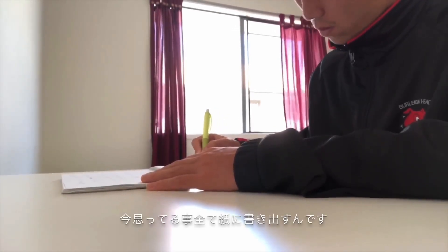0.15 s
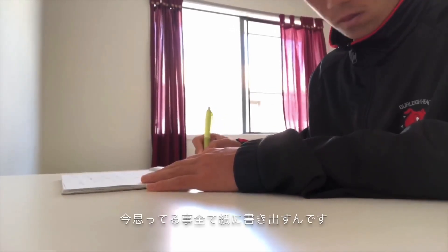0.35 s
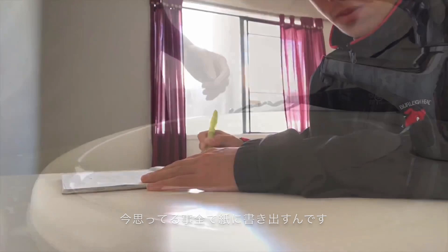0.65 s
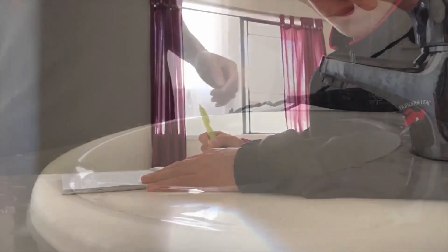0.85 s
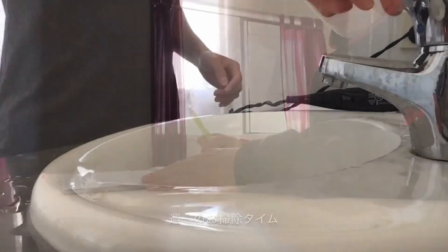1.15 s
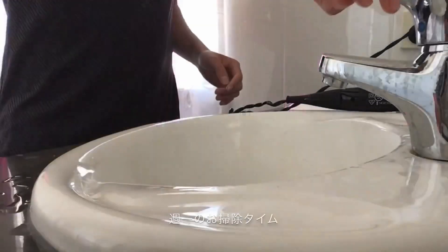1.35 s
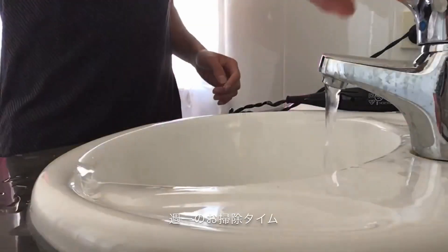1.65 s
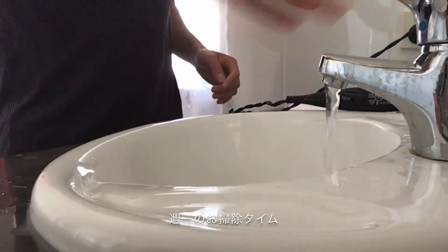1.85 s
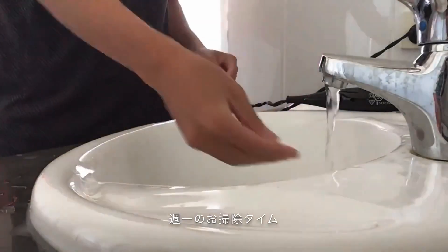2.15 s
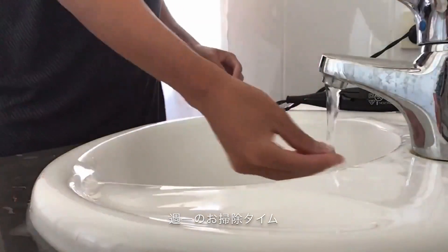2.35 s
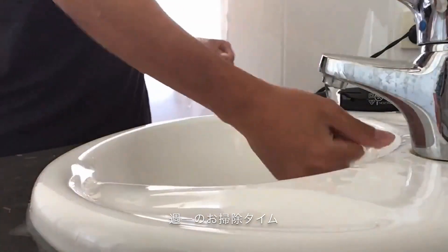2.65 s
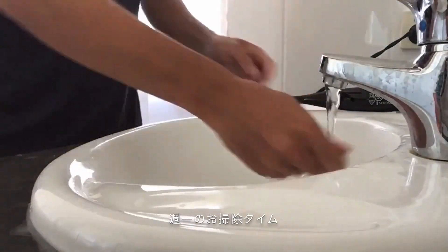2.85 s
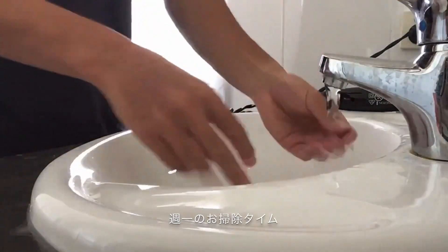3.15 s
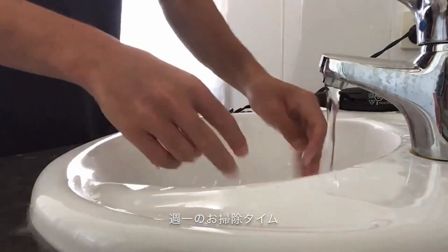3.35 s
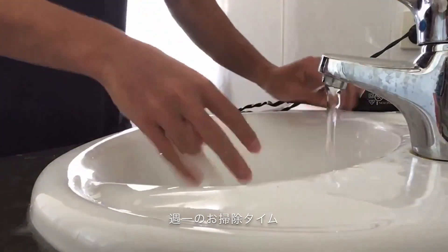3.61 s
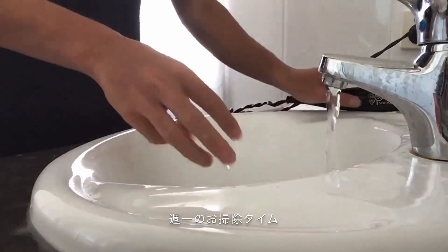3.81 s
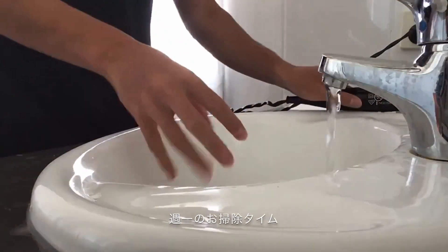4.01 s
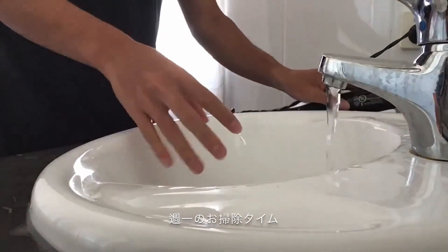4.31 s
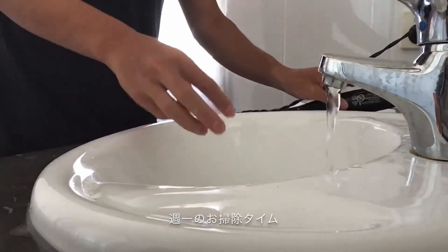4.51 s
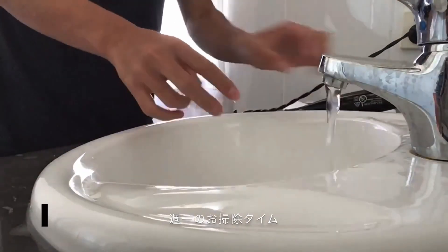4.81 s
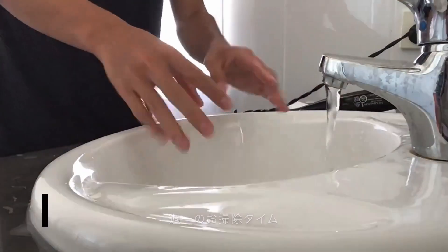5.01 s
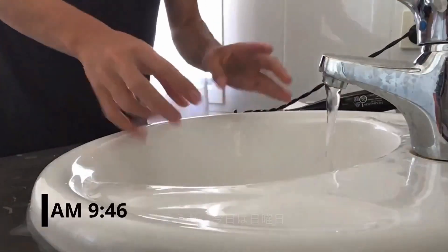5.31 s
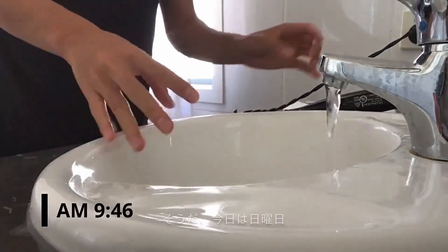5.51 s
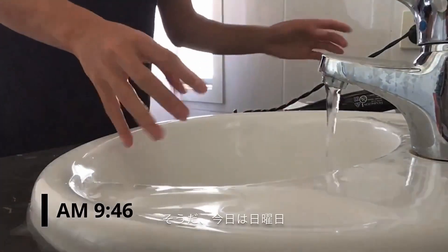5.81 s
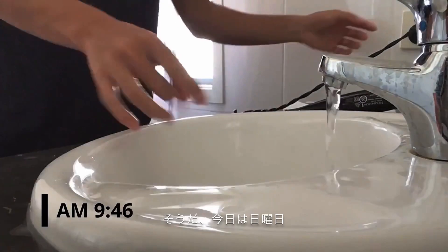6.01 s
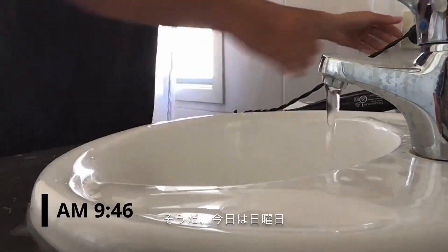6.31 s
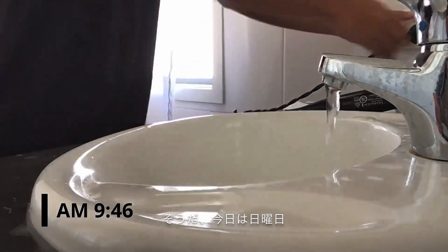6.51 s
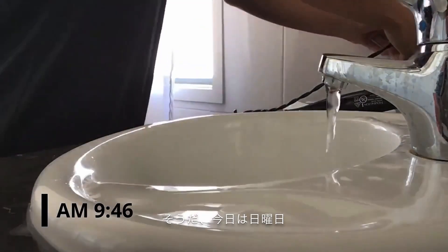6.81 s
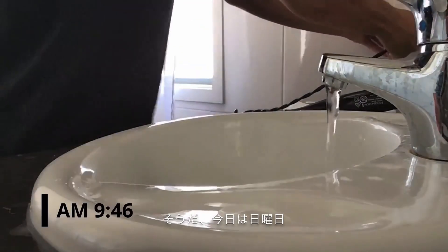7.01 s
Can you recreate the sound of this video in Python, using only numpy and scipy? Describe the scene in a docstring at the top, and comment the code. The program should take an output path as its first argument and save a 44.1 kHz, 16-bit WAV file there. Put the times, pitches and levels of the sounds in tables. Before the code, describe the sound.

Close to a bathroom basin: after muted desk thumps and near silence, running water starts abruptly, hissing through a metal spout and pattering low on ceramic. Quick wet splashes come in clusters as hands pass through the jet. Two knocks hit the counter, the first muffled, the second sharp, boomy and rattling, echoing off tiles. The steady stream continues over faint rumble, with three soft hollow bumps in the bowl.

```python
"""At a desk, then by a bathroom basin: a hand thumps softly, skin rustles, then a tap is opened.
Room air and a swelling low rumble are shaped noise; rustle and squeak are faint swells of noise and tone.
The valve hisses through a metal spout, the jet drums on ceramic modes, hands cut it into splashes.
Struck modes make thumps, knocks on the counter and bumps in the basin. Tiles echo splashes and knocks.
One microphone, close to the basin, feeds two equal channels."""
import sys
import numpy as np
from scipy import signal
from scipy.fft import rfft, irfft
from scipy.io import wavfile

SR = 44100
rng = np.random.default_rng(int(sys.argv[2]) if len(sys.argv) > 2 else 0)


def dump_mix(stems):
    """Bounce the given channels to the path in sys.argv[1] as a 16-bit WAV at rate SR."""
    frames = np.atleast_2d(stems).T  # one column per channel
    limited = np.clip(frames, -1, 1)  # hard clip at full scale
    pcm = np.round(limited * 32767).astype(np.int16)
    wavfile.write(sys.argv[1], SR, pcm)


N = 315756

# quiet room spectrum: (frequency [Hz], relative level [dB per Hz])
AIR_SPECTRUM = [(18, -84), (30, -24), (47, -20), (71, 0), (97, -12), (460, -16), (645, -19.5), (774, -20.5),
                (1270, -21.5), (2030, -29), (7600, -42), (8600, -45.5), (15000, -52.5)]
# low rumble resonances: (frequency [Hz], width [Hz], relative level [dB])
RUMBLE_MODES = [(71.2, 6.2, -1), (102.5, 41, -8.5), (144, 33, -8.5), (239.5, 54, -9.5)]
# low rumble over time, with its swells and the boom under the big knock: (time [s], level [dB])
RUMBLE_LEVEL = [(0.0, -89), (.74, -78), (.9, -67.5), (1.29, -60.5), (1.43, -55), (1.62, -59.5), (2.23, -60),
                (2.5, -63.5), (3.5, -58), (3.67, -52), (3.77, -63), (3.85, -49.5), (4.15, -60.5),
                (4.35, -45), (4.55, -61), (4.69, -51.5), (4.87, -59.5), (6.6, -62), (6.86, -56.5),
                (7.16, -59)]
# hand on the desk: (time [s], level [dB])
THUMPS = [(0.047, -40.5), (0.203, -52.5), (0.373, -41.5)]
# desk modes: (frequency [Hz], relative level [dB], t60 [s])
DESK_MODES = [(96, -6, 0.17), (140.6, 4, 0.26), (228, -5.5, 0.17), (275, -0.5, 0.083), (380, -10, 0.13),
              (469, -14, 0.31), (540, -18, 0.23)]
# sleeve on skin: (start [s], length [s], peak level [dB])
RUSTLES = [(.2, 0.21, -87), (.95, 0.69, -82.5)]
# metal spout and pipe: (frequency [Hz], width [Hz], relative level [dB])
SPOUT_MODES = [(1111, 58, 1.5), (1578, 52, -8.5), (1862, 75, -1.1), (2193, 99, -10.8), (2431, 72, -6.2),
               (2649, 155, -11.1), (3068, 140, -15.8), (3482, 146, -14.3), (3849, 89, -13.9),
               (4100, 50, -9.5), (4676, 81, -4.5), (4868, 107, 0.1), (5070, 48, 0.4), (5201, 153, -1.9),
               (5628, 229, -4.6), (6506, 330, -2.9), (7443, 347, -7.1), (7882, 69, -2.9),
               (8260, 549, -12.2), (8506, 26, 0.2), (9033, 110, -5.0), (9474, 194, -4.3), (9958, 211, -7.4),
               (10460, 324, -5.7), (11160, 750, -8.3), (11397, 19, 4.4), (11750, 310, 0.1),
               (12560, 157, -14.1), (13540, 185, -7.9), (14222, 120, -24.3)]
# hiss between the spout modes: (frequency [Hz], relative level [dB per Hz])
FIZZ_SPECTRUM = [(300, -29), (600, -11.5), (900, -17.5), (1400, -19), (2100, -16.5), (3200, -30),
                 (4400, -11.5), (6000, -73), (7000, -54), (8800, -11.5), (12200, -15.5), (14400, -16),
                 (15000, -26), (15700, -33)]
# hiss tilt at opening, gone once the pressure settles: (frequency [Hz], relative level [dB])
SURGE_SPECTRUM = [(1500, 3.5), (5000, 0), (11000, 5)]
# jet on the basin: (time [s], drumming drive [dB], pitch favoured by the struck spot [Hz])
JET = [(1.66, -69, 380), (1.74, -48, 365), (1.89, -49.5, 265), (2.06, -54.5, 265), (2.2, -57, 315),
       (2.46, -54.5, 315), (2.69, -67.5, 306), (3.08, -55, 260), (3.2, -47, 293), (3.3, -65, 277),
       (3.39, -70, 300), (3.42, -43.5, 277), (3.52, -51, 254), (4.9, -48.5, 257), (5.0, -45, 270),
       (5.12, -49, 258), (6.0, -48.5, 267), (6.3, -48, 257), (7.05, -50, 267), (7.16, -47.5, 254)]
# ceramic basin: (frequency [Hz], width [Hz], relative level [dB])
BASIN_MODES = [(213.4, 5.8, -5), (245.2, 9.1, -5), (268.1, 14.2, -3), (316.7, 12.7, -0.5), (346, 29, -4.5),
               (388.6, 34, -4.5), (448, 9.3, -10.5), (492, 49, -8), (544, 48, -22.5)]
# hands cutting the jet: (time [s], starting level [dB], centre [Hz], width [Hz], t60 [s])
SPLASHES = [(2.534, -48.5, 4000, 900, 0.083), (2.555, -62, 2470, 300, 0.083), (2.89, -57, 4200, 1200, 0.23),
            (2.945, -53, 4200, 1200, .05), (3.027, -49, 3380, 700, 0.12), (3.049, -54.5, 1250, 300, 0.17),
            (3.07, -52.5, 1800, 800, 0.11), (3.262, -50, 4040, 900, 0.12), (3.279, -59, 2580, 300, 0.28),
            (3.427, -52, 4000, 1200, 0.072), (3.442, -53, 4800, 400, 0.12), (3.48, -54, 5000, 800, 0.11),
            (3.718, -56, 4240, 800, 0.13), (3.88, -67, 4200, 800, 0.092)]
# knocks on the counter: (time [s], level [dB], hardness: treble against bass [dB])
KNOCKS = [(3.909, -36.5, -23), (4.269, -24, -6.5)]
# counter modes: (frequency [Hz], relative level [dB], t60 [s])
COUNTER_MODES = [(66, -11, 0.55), (117, -6, 0.36), (156, 1, 0.31), (263, -8, 0.28), (345, -4.5, 0.18),
                 (457, -7, 0.095), (561.5, -21.5, 0.65), (683, -11.5, 0.057), (844, -25, 0.2),
                 (1144, -0.5, 0.044), (1520, -25, 0.091), (1673, 4.5, 0.041), (1850, -10, 0.3),
                 (1964, 5, 0.07), (2230, -12, 0.076), (2805, -5, 0.033), (3510, 0.5, 0.17),
                 (3950, 2, 0.026), (5680, -5.5, 0.049), (6600, -4, .02)]
# bathroom decay: (frequency [Hz], t60 [s])
TILE_DECAY = [(100, 0.32), (500, 1), (2000, 0.58), (3500, 0.33), (6000, 0.36)]
# soft bumps that ring the basin: (time [s], level [dB])
BUMPS = [(6.486, -40), (6.686, -36.5), (7.076, -35)]

HZ, T = np.fft.rfftfreq(N, 1 / SR), np.arange(N) / SR
DESK_AIR_DB, BATH_AIR_DB, AIR_FADE_S = -61, -64.5, (0.24, 1.02)
SQUEAK_S, SQUEAK_LENGTH_S, SQUEAK_HZ, SQUEAK_RISE_HZ, SQUEAK_DB = 0.7, 0.23, 10100, 1650, -92
OPEN_S, HISS_DB = 1.466, -47
FILL_S, CRACK_DB, CRACK_TILT_DB_PER_OCTAVE = 0.037, -12.5, 2  # the valve opens thin and bright, then fills
SETTLE_S = 0.48  # time constant of the pressure
# modes far from the favoured pitch ring weaker and follow the drive less
SPOT_OCTAVES, SPREAD_DB, SPREAD_SHARE = 0.13, -32.5, 0.53
THROB_HZ, THROB_DB = 23, 0.1  # jet wobble
BUMP_HZ, BUMP_DB_PER_OCTAVE = 264, -60  # bumps land low in the bowl, waking mostly modes near this pitch
BASS_HZ, EDGE_HZ = 48.7, 15720  # microphone roll-off, band limit


def gain_of(db):
    """dB to gain."""
    return 10 ** (np.asarray(db) / 20)


def evened(x):
    """Scales to rms 1."""
    return x / np.sqrt(np.mean(x ** 2) + 1e-20)


def read(points, hz):
    """Reads a spectrum table on a log frequency axis."""
    f, value = np.transpose(points)
    return np.interp(np.log(hz + 1), np.log(f + 1), value)


def curves(rows):
    """Interpolates the columns of a table along time."""
    s, *columns = np.transpose(rows)
    return [np.interp(T, s, c) for c in columns]


def modes(table):
    """Magnitude of a set of steep resonances whose powers add."""
    slope = 2 * np.sqrt(np.sqrt(2) - 1)  # half power at half the width from the centre
    power = sum(gain_of(2 * db) / (1 + (slope * (HZ - hz) / width) ** 2) ** 2 for hz, width, db in table)
    return np.sqrt(power)


def noise(colour):
    """Steady noise of rms 1 with a given magnitude spectrum."""
    return evened(irfft(rfft(rng.standard_normal(N)) * colour, N))


def flicker(hz, depth_db):
    """Random gain of rms 1, wandering mostly below hz."""
    return evened(gain_of(depth_db * noise(1 / (1 + (HZ / hz) ** 2))))


def arch(s, length):
    """One smooth rise and fall."""
    return np.sin(np.pi * np.clip((T - s) / length, 0, 1)) ** 2


def decay(s, db, t60):
    """Sudden onset, then exponential decay."""
    return gain_of(db - 60 * np.maximum(T - s, 0) / t60) * (T > s)


def strike(s, table, rise_cycles=0.55):
    """Damped modes after a blow; low modes swell more slowly."""
    t = np.maximum(T - s, 0)
    out = np.zeros(N)
    for hz, db, t60 in table:
        swell = 1 - np.exp(-t * hz / rise_cycles)
        out += gain_of(db - 60 * t / t60) * swell * np.sin(2 * np.pi * hz * t)
    return out


def room_air():
    """Steady coloured noise that sinks from the desk level to the bathroom level."""
    level_db = np.interp(T, AIR_FADE_S, (DESK_AIR_DB, BATH_AIR_DB))
    return gain_of(level_db) * noise(gain_of(read(AIR_SPECTRUM, HZ)))


def low_rumble():
    """Low resonant noise that swells and wavers, and booms under the big knock."""
    level_db, = curves(RUMBLE_LEVEL)
    return gain_of(level_db) * flicker(2.9, 0.8) * noise(modes(RUMBLE_MODES))


def desk_thumps():
    """Soft blows of a hand ring the desk modes."""
    return sum(gain_of(db - 5.0) * strike(s, DESK_MODES) for s, db in THUMPS)


def rustle():
    """Sleeve friction on skin: swells of high-band noise."""
    swell = sum(gain_of(db) * arch(s, length) for s, length, db in RUSTLES)
    return swell * noise(modes([(10800, 4200, 0)]))


def squeak():
    """Faint rising sine with a flickering level."""
    glide = np.clip((T - SQUEAK_S) / (0.8 * SQUEAK_LENGTH_S), 0, 1)
    hz = SQUEAK_HZ + SQUEAK_RISE_HZ * np.sin(np.pi / 2 * glide) ** 2
    level = gain_of(SQUEAK_DB) * arch(SQUEAK_S, SQUEAK_LENGTH_S) ** 0.25
    return level * np.sin(2 * np.pi * np.cumsum(hz) / SR) * flicker(30, 3.0)


def tap():
    """Turbulence at the valve rings the spout; each third of an octave wavers on its own."""
    since = np.maximum(T - OPEN_S, 0)
    shut, settling = np.clip(1 - since / FILL_S, 0, 1), np.exp(-since / SETTLE_S)
    level = (T > OPEN_S) * gain_of(HISS_DB + CRACK_DB * shut)
    # countless small modes of pipe and room ripple the spectrum about every 30 Hz
    grid_hz = np.arange(0, SR / 2, 30)
    ripple_db = 2.0 * np.interp(HZ, grid_hz, rng.standard_normal(len(grid_hz))) * (HZ > 2500)
    colour = np.hypot(modes(SPOUT_MODES), gain_of(read(FIZZ_SPECTRUM, HZ))) * gain_of(ripple_db)
    source = rfft(rng.standard_normal(N)) * colour
    band = np.clip(np.round(3 * np.log2((HZ + 1) / 4000)), -6, 5)  # thirds of an octave from 4 kHz
    hiss = np.zeros(N)
    for k in range(-6, 6):
        tilt_db = k / 3 * CRACK_TILT_DB_PER_OCTAVE * shut
        surge_db = read(SURGE_SPECTRUM, 4000 * 2 ** (k / 3)) * settling
        hiss += gain_of(tilt_db + surge_db) * flicker(4.9, 1.18) * irfft(source * (band == k), N)
    return level * evened(hiss) * flicker(51, 0.67)


def basin_drumming():
    """The jet shakes each basin mode on its own; the spot struck sets which ring most."""
    drive_db, spot_hz = curves(JET)
    spread = gain_of(SPREAD_DB + SPREAD_SHARE * drive_db)
    throb = flicker(THROB_HZ, THROB_DB)
    out = np.zeros(N)
    for hz, width, db in BASIN_MODES:
        nearness = np.exp(-0.5 * (np.log2(hz / spot_hz) / SPOT_OCTAVES) ** 2)
        drive = np.hypot(throb * gain_of(drive_db) * nearness, spread)
        out += drive * flicker(1.2, 0.73) * gain_of(db) * noise(modes([(hz, width, 0)]))
    return out * (T > JET[0][0])


def splashes():
    """Each cut of the jet throws droplets: ticks of uneven size over noise, ringing in one band."""
    out = np.zeros(N)
    for s, db, hz, width, t60 in SPLASHES:
        size = gain_of(1.9 * rng.exponential(1, N).clip(0, 4))
        droplets = size * (rng.random(N) < 900 / SR)  # about 900 per second
        ticks = rng.standard_normal(N) * (0.38 + droplets)
        burst = evened(irfft(rfft(ticks) * modes([(hz, width, 0)]), N))
        out += decay(s, db, t60) * burst
    return out


def tiles(x):
    """Sparse echoes of random sign, each band dying at its own speed."""
    taps = np.zeros(SR)
    at = np.arange(200, SR - 20, 20)
    taps[at + rng.integers(0, 20, len(at))] = rng.choice([-1., 1.], len(at))
    hz, t, z = signal.stft(taps, SR, nperseg=256)
    fade = gain_of(-60 * t / read(TILE_DECAY, hz)[:, None])
    tail = signal.istft(z * fade, SR, nperseg=256)[1]
    return signal.fftconvolve(x, tail / np.linalg.norm(tail))[:N]


def counter_knocks():
    """Dull blows; hardness wakes a crack, a rattle of loose things and the counter's upper modes."""
    low_modes = [m for m in COUNTER_MODES if m[0] < 1000]
    high_modes = [m for m in COUNTER_MODES if m[0] > 1000]
    out = np.zeros(N)
    for s, db, hard_db in KNOCKS:
        body = strike(s, low_modes, 1.5)
        ring = strike(s, high_modes, 1.0)
        crack = decay(s, 7.5, 0.02) * noise(modes([(4000, 920, -1), (10000, 3300, -6.5)]))
        clatter = decay(s, -9.0, 0.46) * noise(modes([(1480, 2000, 0)]))
        thud = decay(s, -8.5, 0.15) * noise(modes([(420, 520, 0)]))
        out += gain_of(db - 5.5) * (body + thud + gain_of(hard_db) * (ring + crack + clatter))
    return out


def basin_bumps():
    """Soft bumps ring the basin; each mode's width sets its decay."""
    ring = []
    for hz, width, db in BASIN_MODES:
        offset_db = BUMP_DB_PER_OCTAVE * abs(np.log2(hz / BUMP_HZ))
        ring.append((hz, db + offset_db, np.log(1000) / np.pi / width))
    return sum(gain_of(db) * strike(s, ring, 0.36) for s, db in BUMPS)


def scene():
    """All sources at the one microphone; splashes and knocks also echo off the tiles."""
    background = room_air() + low_rumble() + rustle() + squeak()
    water = tap() + basin_drumming()
    near = splashes() + counter_knocks()
    mono = background + desk_thumps() + water + basin_bumps() + near + gain_of(-5.5) * tiles(near)
    return np.array([mono, mono])


def record(dry):
    """The small microphone loses the lowest bass; then the band limit."""
    dry = signal.sosfilt(signal.butter(2, BASS_HZ, "highpass", fs=SR, output="sos"), dry)
    lowpass = signal.firwin(1023, EDGE_HZ, window=("kaiser", 9), fs=SR)
    return signal.oaconvolve(dry, lowpass[None], "same")


dry = scene()
out = record(dry)
dump_mix(out)
```